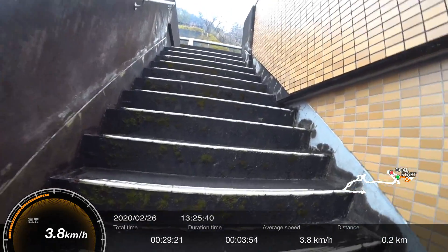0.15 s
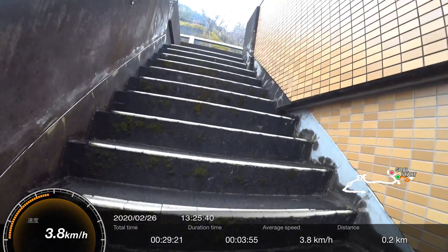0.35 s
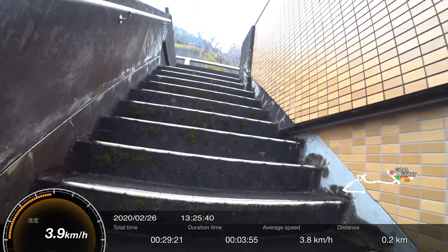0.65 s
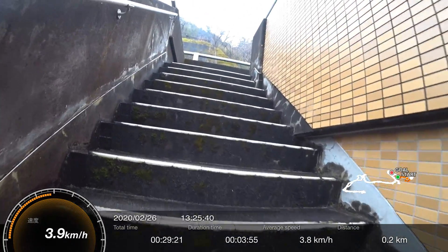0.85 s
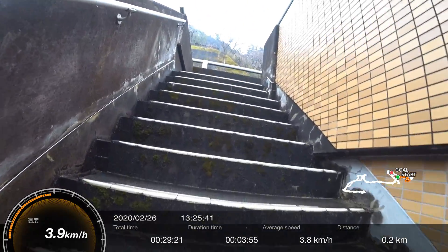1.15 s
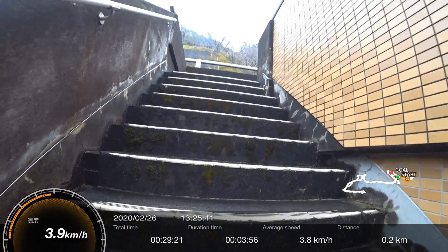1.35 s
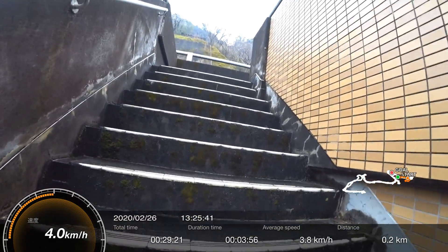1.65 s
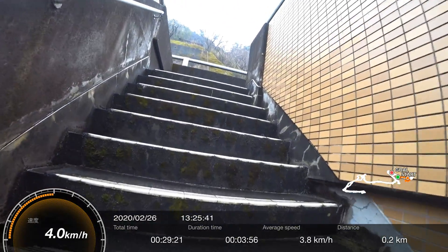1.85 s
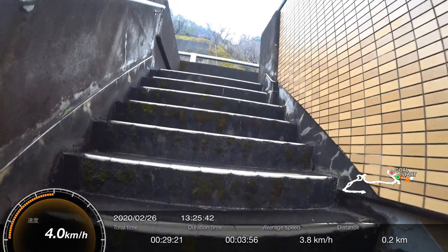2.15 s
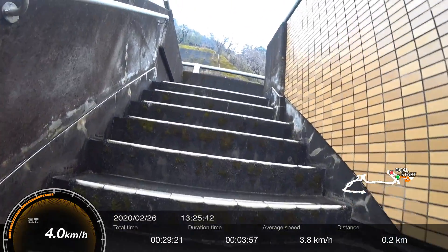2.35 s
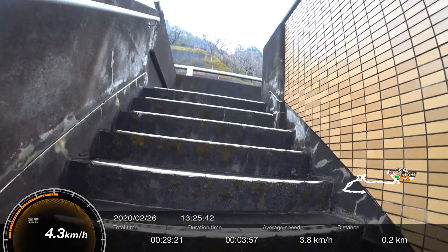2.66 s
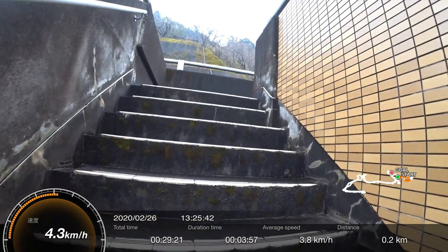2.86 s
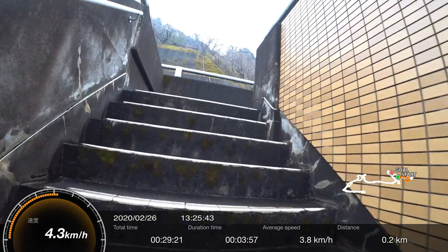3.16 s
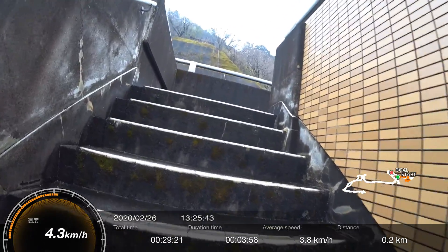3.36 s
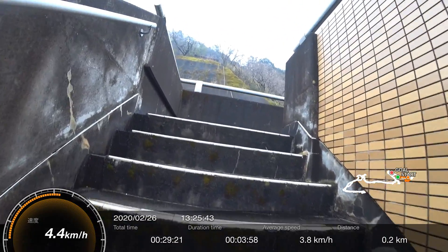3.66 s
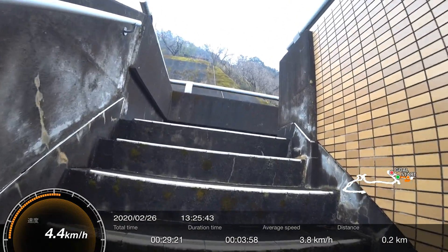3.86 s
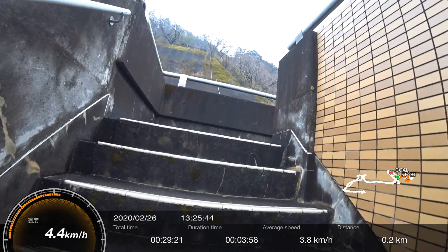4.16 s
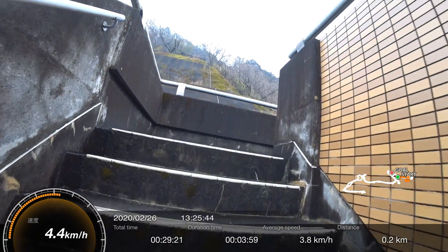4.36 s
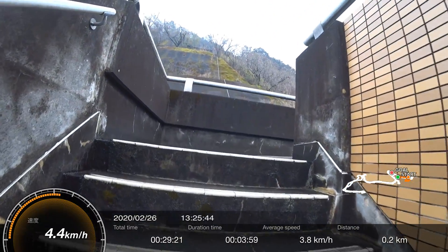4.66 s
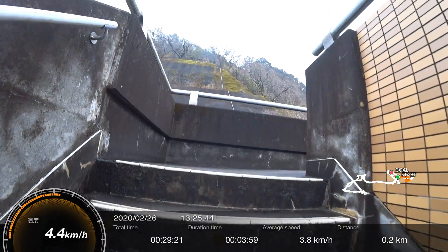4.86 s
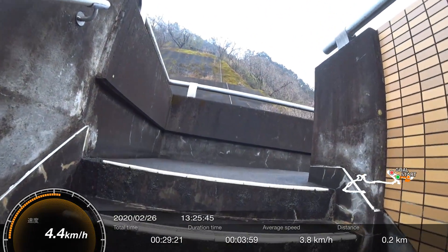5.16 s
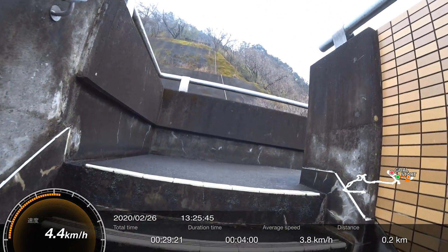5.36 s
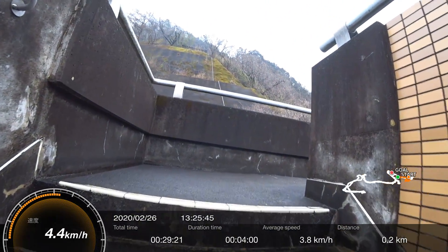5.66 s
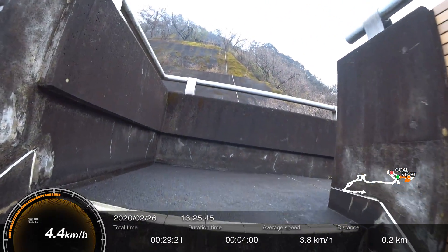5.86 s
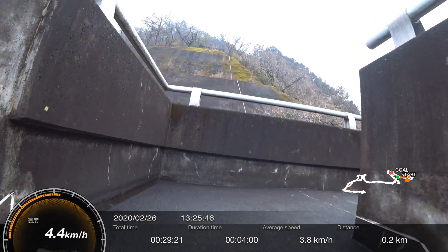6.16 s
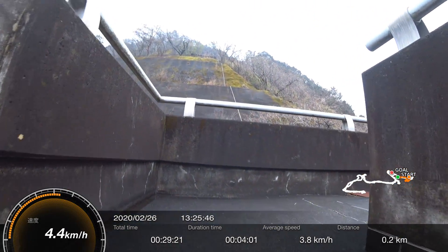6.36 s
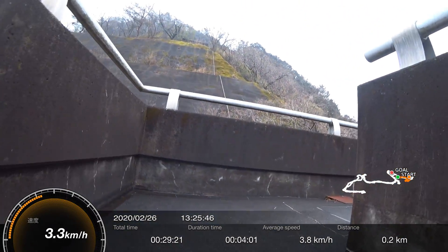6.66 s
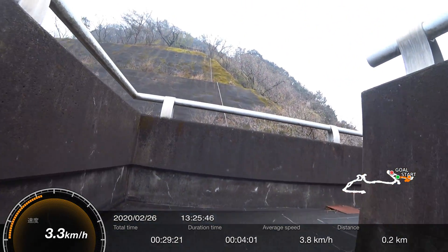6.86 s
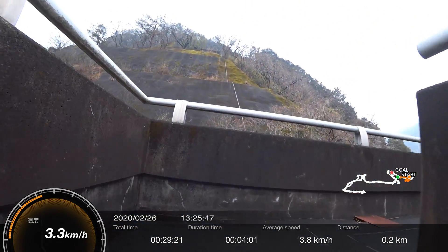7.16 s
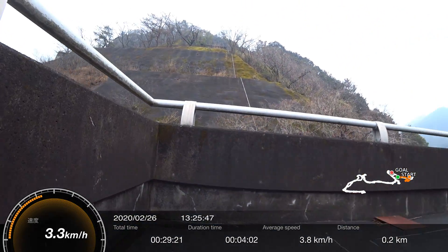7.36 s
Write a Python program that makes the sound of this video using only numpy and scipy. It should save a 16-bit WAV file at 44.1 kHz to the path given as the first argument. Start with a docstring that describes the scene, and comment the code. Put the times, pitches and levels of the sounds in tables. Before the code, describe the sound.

Shoes climb gritty concrete stairs outdoors at an even pace, with swishing clothes, tiny gear squeaks and a few faint bird whistles.

```python
"""Outdoors, in a narrow stairwell between two walls, someone climbs concrete stairs wearing a camera.
Each hard sole lands in a few quick contacts, crushing grit, and the walls throw the sound back.
Between steps, cloth swishes over cloth, and carried gear ticks and squeaks.
Small birds whistle over the soft hush of a valley, and a faint low hum is left behind."""
import sys
import numpy as np
from scipy import signal
from scipy.fft import rfft, irfft, next_fast_len
from scipy.io import wavfile
from scipy.ndimage import uniform_filter1d

SR = 44100
rng = np.random.default_rng(int(sys.argv[2]) if len(sys.argv) > 2 else 0)


def master_out(mix):
    """Clip the mix to full scale and print it as 16-bit PCM to the path in sys.argv[1]."""
    frames = np.transpose(np.atleast_2d(mix))
    ceiling = np.clip(frames, -1, 1)
    pcm = np.round(ceiling * 32767).astype(np.int16)
    wavfile.write(sys.argv[1], SR, pcm)


N = 331191
TIME = np.arange(N) / SR
HIT_TIME = np.arange(2 ** 14) / SR  # seconds since the start of one short sound
SIDES = np.array([[1], [-1]])  # plus on the left, minus on the right

# Footfalls, left and right in turn: (first touch [s], level [dB], heel weight [dB], grit [dB],
# main blow delay [s], last slap delay [s], heel thump [Hz], hollow knock [Hz], sole clack [Hz])
FOOTFALLS = [(0.5829, -48, -3, -1.5, .0015, 0.011, 260, 557, 1470),
             (1.2382, -34, 4, -7, 0.0033, 0.0092, 328, 500, 1960),
             (1.83, -45.5, -6, 9, .005, .012, 250, 540, 3080),
             (2.4483, -34, -4, 4.5, 0.0025, 0.011, 287, 470, 2100),
             (3.103, -38.5, -0.5, -.5, .0017, 0.0067, 280, 840, 1820),
             (3.7334, -38.5, 2, -3.5, 0.005, 0.0073, 242, 880, 2180),
             (4.327, -44.5, -3, -2, .006, .0095, 295, 487, 2300),
             (4.954, -35.5, 3.5, 11.5, .0025, .0058, 380, 554, 2670),
             (5.6287, -43, -3, 0, 0.0023, 0.0052, 316, 805, 1450),
             (6.2567, -37.5, -9.5, 7.5, 0.011, 0.017, 390, 563, 2080),
             (6.9404, -37.5, 5.5, -7.5, 0.0021, 0.0046, 232, 560, 1980)]
# Borders of six pitch bands, from bass to treble: (frequency [Hz])
BAND_EDGES = [70, 350, 900, 1700, 3200, 5500, 11000]
BANDS = list(zip(BAND_EDGES, BAND_EDGES[1:]))


def gain(db):
    """Turn decibels into a number to multiply by."""
    return 10 ** (np.asarray(db) / 20)


def unit(x):
    """Scale a sound to an average (rms) level of 1."""
    return x / np.sqrt(np.mean(x ** 2) + 1e-24)


def set_start_level(x, db, seconds):
    """Scale a hit so that its first moments have the given level."""
    return x * gain(db) / np.sqrt(np.mean(x[..., :int(seconds * SR)] ** 2) + 1e-24)


def band(x, lo_hz, hi_hz, order=3):
    """Keep the sound between two pitches."""
    return signal.sosfilt(signal.butter(order, [lo_hz, hi_hz], "band", fs=SR, output="sos"), x)


def resonate(x, hz, width_hz):
    """Ring at one pitch; a narrower width rings longer."""
    return signal.lfilter(*signal.iirpeak(hz, hz / width_hz, fs=SR), x)


def colour(x, points):
    """Shape a steady sound along a curve of (frequency [Hz], level [dB]) points."""
    hz, db = np.transpose(points)
    size = next_fast_len(N)
    freqs = np.maximum(np.fft.rfftfreq(size, 1 / SR), 1)
    curve_db = np.interp(np.log(freqs), np.log(hz), db)
    return irfft(rfft(x, size) * gain(curve_db), size)[..., :N]


def colour_hit(x, hz, db):
    """Shape a hit's bass and treble, with one row of levels for each channel."""
    size = 2 * x.shape[-1]
    freqs = np.maximum(np.fft.rfftfreq(size, 1 / SR), 1)
    log_gain = np.array([np.interp(np.log(freqs), np.log(hz), np.log(gain(row))) for row in db])
    # folding the filter forward in time keeps it from sounding before the hit
    fold = np.r_[1, np.full(size // 2 - 1, 2), 1, np.zeros(size // 2 - 1)]
    response = np.exp(rfft(irfft(log_gain, size) * fold))
    return irfft(rfft(x, size) * response, size)[:, :size // 2]


def wander(turns_per_s):
    """A random drift, mostly between -1 and 1."""
    hold = int(SR / turns_per_s)
    return uniform_filter1d(np.repeat(rng.standard_normal(N // hold + 1), hold), hold)[:N]


def fade(t60):
    """Die away by 60 dB in t60 seconds."""
    return np.exp(-np.log(1000) * HIT_TIME / t60)


def add(out, start_s, x):
    """Mix x into out at the given time."""
    i = max(int(start_s * SR), 0)
    out[..., i:i + x.shape[-1]] += x[..., :max(N - i, 0)]


def stride_times():
    """When the leg on the side of the gear lands: every second step."""
    return np.array(FOOTFALLS)[::2, 0]


def with_echo(x, db, t60):
    """Add a blurred echo from the walls, different in each ear."""
    walls = rng.standard_normal((2, len(HIT_TIME))) * fade(t60)
    walls /= np.linalg.norm(walls[0])
    return x + gain(db) * signal.fftconvolve(np.atleast_2d(x), walls, axes=1)[:, :N]


def stairwell(direct_db=13, crack_t60=0.017, early_db=-8, early_t60=0.13, tail_db=-23, tail_t60=0.5):
    """How a click sounds here: a crack off the nearest stairs, quick wall echoes, a dull tail."""
    noise = rng.standard_normal((2, len(HIT_TIME)))
    direct = gain(direct_db) * (HIT_TIME == 0)
    out = 0
    for lo, hi in BANDS:
        hz = np.sqrt(lo * hi)
        linger = (2000 / hz) ** 0.41  # every bounce takes more from the treble
        early = gain(early_db) * fade(early_t60 * np.sqrt(linger))
        tail = gain(tail_db) * fade(tail_t60 * linger)
        decay = fade(crack_t60) + early + tail
        mid = band(noise[0] * decay + direct, lo, hi)
        side = band(noise[1] * decay, lo, hi)
        side *= gain(-3.5) * hz / np.hypot(hz, 700)  # bass reaches both microphones alike
        out = out + (mid + SIDES * side) / np.linalg.norm(decay + direct)
    return out


def hum(hz=48.0):
    """A faint low hum at the foot of the stairs, left behind on the way up."""
    # Loudness of the hum: (time [s], level [dB])
    levels = [(0, -85), (2.5, -84), (4.5, -92), (7.5, -106)]
    return np.sqrt(2) * np.sin(2 * np.pi * hz * TIME) * gain(np.interp(TIME, *np.transpose(levels)))


def valley(wall_hz=1250, flicker_db=1.5, drone_hz=312, drone_db=-71):
    """A distant hush; the gap between the walls colours it and drones faintly."""
    # Tone of the hush: (frequency [Hz], level [dB])
    hush_tone = [(25, -36), (60, -18.5), (110, -22.5), (180, -13), (260, -10), (336, -7), (444, -4),
                 (800, -10.5), (1200, -9), (1710, -11.5), (3000, -15), (6400, -22), (8750, -25.5),
                 (11000, -27)]
    # Stereo width, the part that differs between the ears: (frequency [Hz], relative level [dB])
    hush_width = [(60, -11), (200, -11.5), (340, -11), (610, -4.5), (1100, -0.5), (2000, -0.5), (3500, -5),
                  (11000, -2.5)]
    # The hush as the walls open out: (time [s], level [dB], boost from the walls [dB])
    hush_levels = [(0, -53.5, 2), (1.4, -55, 1.5), (2.7, -56, 0.6), (7.5, -56.5, 0.5)]
    times, level_db, wall_db = np.transpose(hush_levels)
    mid, side = colour(rng.standard_normal((2, N)), hush_tone)
    air = unit(mid + SIDES * colour(side, hush_width))
    boost_db = np.interp(TIME, times, wall_db) + flicker_db * wander(14)
    air += resonate(air, wall_hz, width_hz=900) * (gain(boost_db) - 1)
    # a lower band flickers too
    air += resonate(air, hz=460, width_hz=220) * (gain(flicker_db * wander(12)) - 1)
    drone = resonate(rng.standard_normal(N), drone_hz, width_hz=25)
    drone = unit(resonate(drone, drone_hz, width_hz=50))
    return air * gain(np.interp(TIME, times, level_db)) + gain(drone_db) * drone


def birds(waver=0.005):
    """Thin, gliding whistles that waver a little and echo off the walls."""
    # Bird notes, one list of points each: (time [s], pitch [Hz], level [dB])
    notes = [
        [(.95, 5170, -60), (.98, 5300, -51.5), (1.0, 5120, -58), (1.015, 5300, -67), (1.045, 5280, -59),
         (1.075, 5290, -66)],
        [(1.655, 5320, -74), (1.68, 5300, -64), (1.71, 5270, -66)],
        [(6.043, 9550, -56), (6.047, 8300, -61), (6.052, 9500, -51.5), (6.057, 10400, -61)],
    ]
    song = np.zeros(N)
    for note in notes:
        times, hz, db = np.transpose(note)
        gate = uniform_filter1d(1. * ((TIME > times[0]) & (TIME < times[-1])), size=90)
        pitch = np.interp(TIME, times, hz) * (1 + waver * wander(280))
        whistle = np.sqrt(2) * np.sin(2 * np.pi * np.cumsum(pitch) / SR)
        song += gate * gain(np.interp(TIME, times, db)) * whistle
    return with_echo(song, db=-6, t60=0.35)


def clothing(swish_db=-54.5, swish_db_per_s=-0.32, other_leg_db=-7, grain_db=2, flutter_db=3, pan_db=3):
    """Cloth slides over cloth as the legs swing; the weave catches in tiny grains."""
    # Tone of the rubbing cloth: (frequency [Hz], level [dB])
    cloth_tone = [(200, -14), (600, -16), (1300, -1.5), (3000, 2), (5000, 0.5), (7000, -1), (8500, -6),
                  (11000, -6.5)]
    # Drag of the cloth, easing near the top of the stairs: (time [s], level [dB])
    drag_levels = [(0, -58), (3.2, -60.5), (4.6, -63), (7.5, -71)]

    def rub(peak_s, half_length_s, db):
        """The power of one rub, swelling and fading."""
        return (gain(db) * np.exp(-((TIME - peak_s) / half_length_s) ** 2)) ** 2

    power = np.zeros(N)
    # a leg swishes past the other just before it lands; one leg rubs much more
    for k, (step_s, *_) in enumerate(FOOTFALLS):
        db = swish_db + swish_db_per_s * step_s + other_leg_db * (k % 2)
        power += rub(step_s - 0.14, 0.11, db)
    # the cloth drags on while that leg straightens
    for step_s in stride_times():
        power += rub(step_s + 0.15, 0.17, np.interp(step_s, *np.transpose(drag_levels)))
    grainy_noise = rng.standard_normal((2, N)) * gain(grain_db * wander(900))
    mid, side = colour(grainy_noise, cloth_tone)
    rustle = unit(mid + SIDES * side * gain(-4))
    return rustle * np.sqrt(power) * gain(flutter_db * wander(35) + SIDES * pan_db / 2)


def gear_squeaks(pitch_hz=7196, scatter_hz=50, scatter_s=0.008, slips_per_s=900, rasp_db=-20, pan_db=2):
    """A joint in the gear breaks loose, then sticks and slips, ringing one thin, raspy note."""
    # The loudest squeaks: (start [s], length [s], level [dB])
    loud_squeaks = [(0.136, .005, -46.5), (1.941, 0.017, -64), (2.164, 0.042, -53), (3.262, 0.031, -57.5),
                    (4.385, 0.026, -65.5), (4.497, .022, -58.5), (5.173, 0.034, -62.5), (5.487, .02, -64)]
    # Squeaks in every stride, as the leg swings and takes the load:
    # (start relative to the footfall [s], length [s], level [dB])
    stride_squeaks = [(-.19, .04, -68.5), (0.103, 0.039, -62.5), (.165, .025, -64.5), (.25, .03, -72)]
    out = np.zeros((2, N))
    regular = [(step_s + lag_s + scatter_s * rng.standard_normal(), length_s, db)
               for step_s in stride_times() for lag_s, length_s, db in stride_squeaks]
    for start_s, length_s, db in loud_squeaks + regular:
        slipping = (rng.random(len(HIT_TIME)) < slips_per_s / SR) & (HIT_TIME < length_s)
        slips = slipping * rng.random(len(HIT_TIME))
        slips[0] = 0.96  # the joint breaks loose
        hz = pitch_hz + scatter_hz * rng.standard_normal()
        ring = resonate(slips, hz, width_hz=93)
        squeak = resonate(ring + gain(rasp_db) * slips, hz, width_hz=700)
        add(out, start_s, set_start_level(squeak, db, length_s) * gain(SIDES * pan_db / 2))
    return with_echo(out, db=-8, t60=0.19)


def taps(ticks_per_s=0.7, tick_db=-54, tick_tilt_db=-12, rebound_s=0.0082, rebound_db=-6):
    """Small knocks and fainter ticks at random times, each with a weak bounce."""
    # Light taps of the shoes and gear: (time [s], level [dB], tilt toward treble [dB per octave])
    light_taps = [(0.6621, -44.5, 4), (0.9396, -46, 0), (3.3879, -48, -2), (4.7392, -46, 0.5),
                  (5.946, -50, -2), (6.977, -48.5, 1.5), (7.2215, -46, .5)]
    out = np.zeros((2, N))
    tick_times = rng.random(int(ticks_per_s * N / SR)) * N / SR
    ticks = [(start_s, tick_db, tick_tilt_db) for start_s in tick_times]
    for start_s, db, tilt_db in light_taps + ticks:
        click = stairwell(direct_db=21.5, early_t60=0.11)
        tilted = sum(set_start_level(band(click, lo, hi), tilt_db * np.log2(lo / 1700), seconds=0.02)
                     for lo, hi in BANDS[1:])
        tap = set_start_level(band(tilted, 450, 4000, order=1), db, seconds=0.0076)
        add(out, start_s, tap)
        add(out, start_s + rebound_s, tap * gain(rebound_db))
    return out


def sole_contacts(blow_s, slap_s, touch_db=-6, slap_db=-4, grit_db=-20, grit_t60=0.03):
    """The sole touches, takes the weight and slaps flat, crushing grit as it rolls."""
    grains = rng.standard_normal(len(HIT_TIME)) * (rng.random(len(HIT_TIME)) < 0.1)
    # the grit crunches fully until the sole lies flat, then dies away
    push = gain(grit_db) * grains * np.interp(HIT_TIME - slap_s, HIT_TIME, fade(grit_t60))
    for delay_s, db in ((0, touch_db), (blow_s, 0), (slap_s, slap_db)):
        push[int(delay_s * SR)] += gain(db)
    return push


def band_levels(hit):
    """The level in dB of each pitch band over the first 50 ms of a hit."""
    start = hit[:, :SR // 20]
    return np.array([10 * np.log10(np.mean(band(start, lo, hi) ** 2)) for lo, hi in BANDS])


def step_levels(hz, level_db, heel_db, grit_db, ordinary_db=-37.5, heel_hz=290, grit_hz=4300):
    """A step's level at each pitch: hard landings thud and clack, the heel adds bass, grit treble."""
    # Tone of an ordinary step: (frequency [Hz], relative level [dB], extra per dB harder [dB/dB])
    ordinary_tone = [(160, -17, .5), (560, -3.5, -0.1), (1240, -2, -0.21), (2330, 3, 0.26),
                     (4170, 1.2, 0.1), (7720, -15.5, 0.17)]
    at_hz, db, growth = np.transpose(ordinary_tone)
    sole_db = np.interp(np.log(hz), np.log(at_hz), db + growth * (level_db - ordinary_db))
    bass_share = 1 / (1 + (hz / heel_hz) ** 4)
    treble_share = 1 / (1 + (grit_hz / hz) ** 4)
    return level_db + sole_db + bass_share * heel_db + treble_share * grit_db


def footsteps(ring_db=-3, spread_db=-9, shade_hz=2000, pan_db=2.5):
    """Each landing makes the shoe and the stair ring, and the sound spreads through the stairwell."""
    # Tones that every step rings with: (frequency [Hz], width [Hz], level [dB])
    ring_tones = [(584, 13, 2), (1047, 180, 0), (1870, 45, -21), (2000, 200, -3), (2380, 660, -3.5),
                  (2790, 240, -0.5), (3460, 220, 1.5), (3900, 130, -20), (4140, 66, -1), (4570, 140, 1),
                  (4937, 56, 10), (5740, 300, 6.5), (7180, 130, 9), (7780, 66, 5)]
    out = np.zeros((2, N))
    centres_hz = np.sqrt([lo * hi for lo, hi in BANDS])
    # the camera's body shades one side, mostly in the treble
    shade_db = SIDES * np.minimum(centres_hz / shade_hz, 1) * pan_db / 2
    # a sole is too small to give off deep bass
    bass_cut = signal.butter(3, 130, "high", fs=SR, output="sos")
    for start_s, level_db, heel_db, grit_db, blow_s, slap_s, thump_hz, knock_hz, clack_hz in FOOTFALLS:
        push = signal.sosfilt(bass_cut, sole_contacts(blow_s, slap_s))
        ring = sum(gain(ring_db + db) * resonate(push, hz, width) for hz, width, db in ring_tones)
        ring += gain(7) * resonate(push, thump_hz, width_hz=95)
        ring += gain(7) * resonate(push, knock_hz, width_hz=95)
        ring += gain(4) * resonate(push, clack_hz, width_hz=340)
        source = push + gain(spread_db) * ring
        # heel and toe strike different spots, each with its own echoes
        heel_part = HIT_TIME < (blow_s + slap_s) / 2
        echoes = sum(signal.fftconvolve(stairwell(), (source * part)[None])
                     for part in (heel_part, ~heel_part))
        hit = ring + echoes[:, :len(HIT_TIME)]
        # how flat and how hard the sole lands sets its balance from thud to grit
        balance_db = step_levels(centres_hz, level_db, heel_db, grit_db) - band_levels(hit)
        add(out, start_s, colour_hit(hit, centres_hz, balance_db + shade_db))
    return out


def scene():
    """The climber and the surroundings, in stereo."""
    return footsteps() + taps() + gear_squeaks() + clothing() + birds() + valley() + hum()


def record(dry, top_hz=11050):
    """The camera cuts off the highest treble."""
    return signal.sosfilt(signal.ellip(10, 0.2, 70, top_hz, fs=SR, output="sos"), dry)


dry = scene()
out = record(dry)
master_out(out)
```